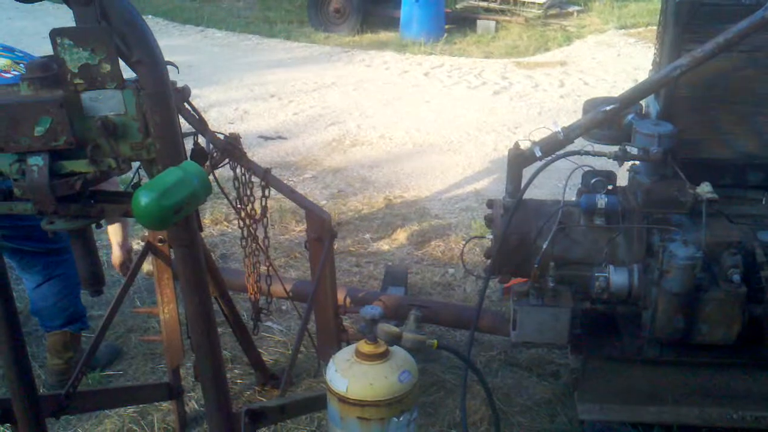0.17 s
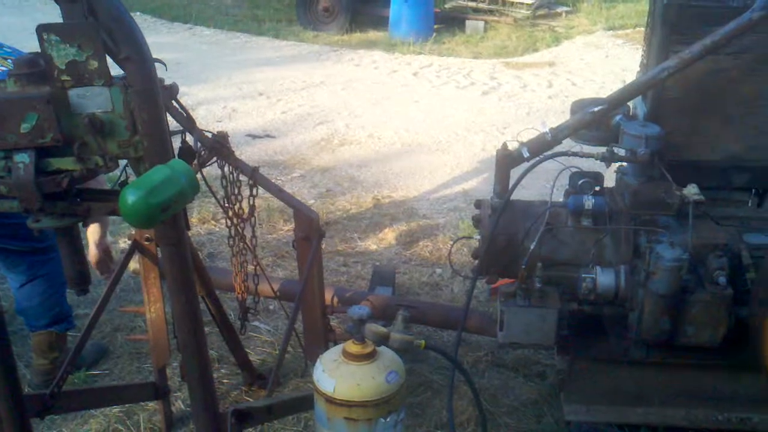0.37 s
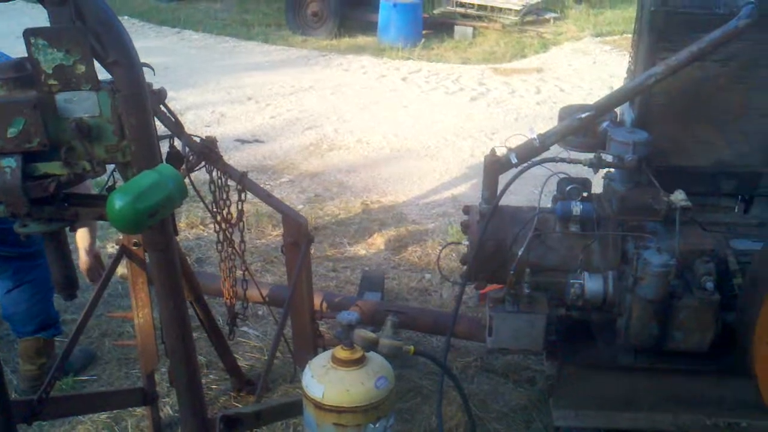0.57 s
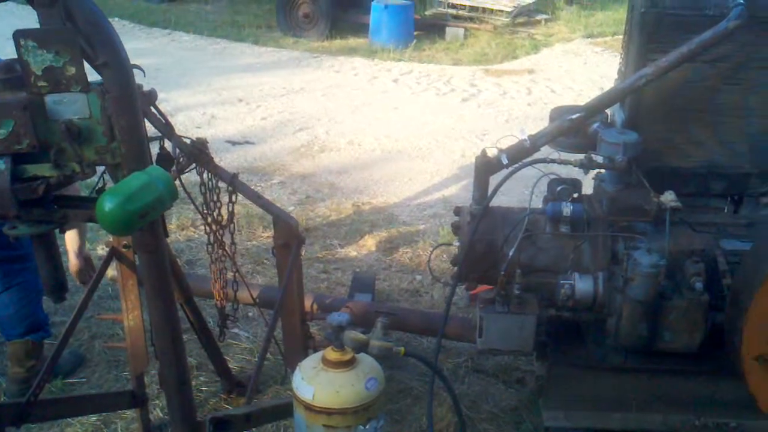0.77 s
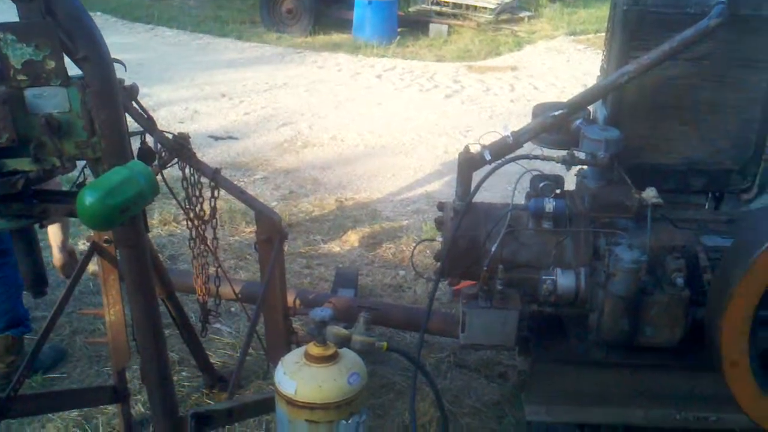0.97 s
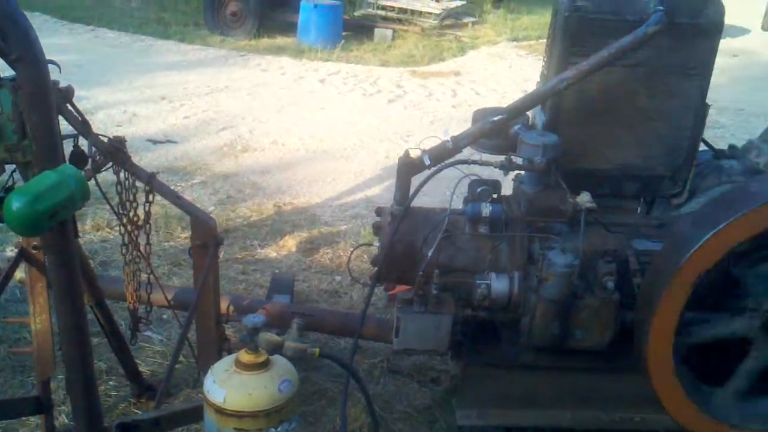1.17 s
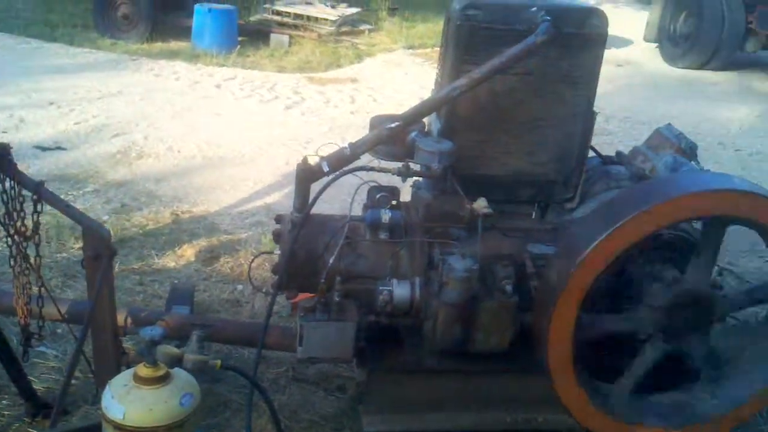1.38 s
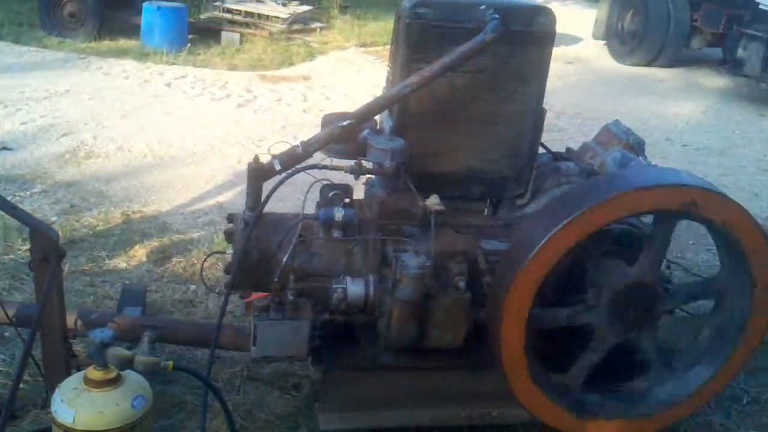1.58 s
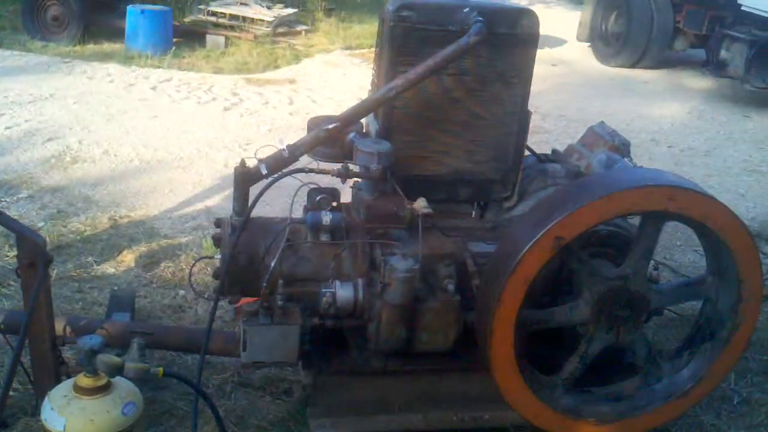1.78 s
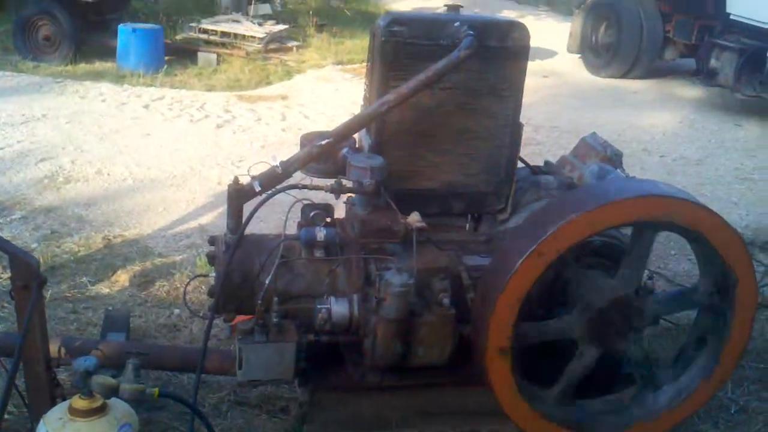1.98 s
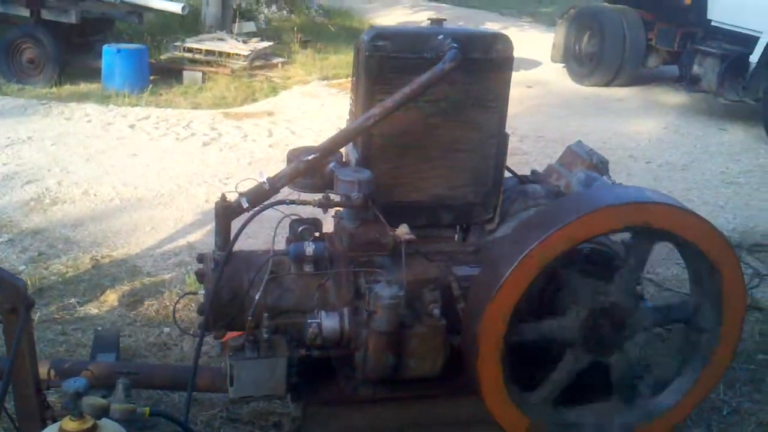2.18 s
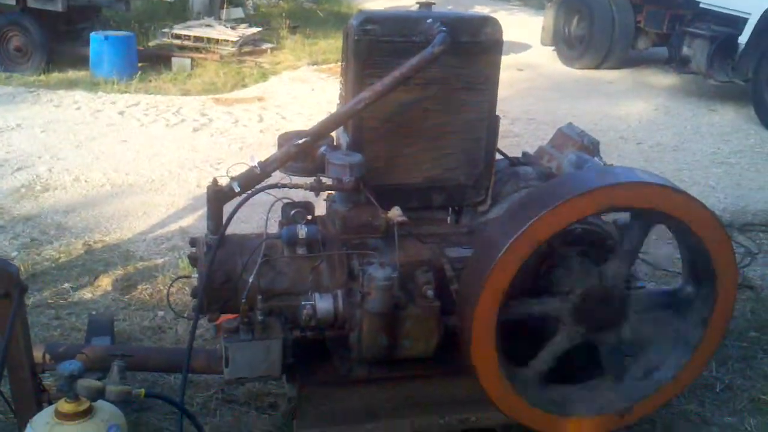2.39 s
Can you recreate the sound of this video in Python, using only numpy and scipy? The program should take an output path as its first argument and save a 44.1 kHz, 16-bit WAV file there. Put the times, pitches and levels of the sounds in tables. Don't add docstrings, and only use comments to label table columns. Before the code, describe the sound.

Old flywheel engine outdoors, heard from nearby on a small stereo recorder: loud raspy pop with a short hiss, then three breathy puffs growing slightly stronger, repeated three times over a very faint yard background.

```python
import sys
import numpy as np
from scipy import signal
from scipy.fft import rfft, irfft, next_fast_len
from scipy.io import wavfile
from scipy.ndimage import uniform_filter1d

SR = 44100
rng = np.random.default_rng(int(sys.argv[2]) if len(sys.argv) > 2 else 0)


def generate_wav(signal):
    frames = np.transpose(np.atleast_2d(signal))
    scaled = np.clip(frames, -1, 1) * 32767
    pcm = np.round(scaled).astype(np.int16)
    wavfile.write(sys.argv[1], SR, pcm)


def attenuation_scalar(level_db):
    decades = np.asarray(level_db, float) / 20
    return 10 ** decades


N = 108045
LEAD = 4410

# (time [s], peak [dB])
FIRINGS = [
    (0.205, -4.5),
    (1.159, -4.5),
    (2.111, -5.5),
]
# (time [s], peak [dB])
COASTS = [(0.439, -25), (0.678, -22), (0.917, -19.5), (1.393, -25), (1.631, -23), (1.871, -20.5),
          (2.346, -24)]
# (time [s], peak [dB])
EARLIER_COAST = (-0.029, -21.5)
# (time [s], peak [dB])
COOL_SHUTS = [(.066, -26.5), (.542, -32), (.781, -30), (1.023, -30.5), (1.496, -32), (1.734, -31),
              (1.975, -30.5), (2.446, -33)]
# (time [s], peak [dB])
HOT_SHUTS = [(.305, -31), (1.260, -32), (2.214, -32.5)]

# (delay [ms], shell ring [dB], low push [dB])
FIRE_SURGES = [(0.0, -1, -4), (4.73, -10.5, -9), (9.34, -9.5, -5.5), (14.96, -0.5, -2), (21.05, -5, -3.5),
               (26.38, -12, -6.5), (38.03, -14.5, -15)]
# (delay [ms], shell ring [dB], low push [dB])
COAST_SURGES = [(0.0, -1, 0), (11.925, -8, -0.5), (16.24, -10.5, -11), (22.48, -22.5, 0),
                (32.98, -15.5, -3.5), (50.63, -52, -9.5)]
# (delay [ms], shell ring [dB], low push [dB])
SHUT_SURGES = [(-18.5, -31, -15), (0.5, 1.5, 3), (11, -4, 3), (16.5, -40, -5.5), (50, -11, -18)]

# (peak at [ms], jet rise [ms], jet t60 [s], pipe t60 [s],
# tail [dB], tail t60 [s], pipe noise [dB], hiss [dB])
FIRE_FLOW = (25.5, 6.5, 0.0521, 0.002, -11, 0.24, -13, -18)
COAST_FLOW = (29, 6, 0.24, 0.32, -26, 0.54, -16.5, -34)
# (mode [Hz], level [dB], t60 [s])
COOL_PIPE = [(91.8, -2, 0.105), (192, 4.5, 0.033), (275, 4.5, 0.077), (405, -3, 0.04), (479, -16, 0.27),
             (794, -13.5, 0.035), (995, -7.5, 0.033), (1060, -9, 0.047), (1168, -13.5, 0.28),
             (1254, -11, 0.061), (1327, -14, 0.077), (1440, -37, .08), (2440, -17, 0.081)]
# (mode [Hz], level [dB], t60 [s])
HOT_PIPE = [(146.4, 1.5, 0.091), (324.3, 3.5, 0.085), (649, -9.5, 0.063), (512.5, -3.5, 0.071),
            (820, -3, 0.038), (950, -11, 0.033), (992, -7, 0.042), (1085, -4.5, 0.049), (1190, -13, 0.073),
            (1216, -7, 0.057), (1340, -15.5, 0.062), (1370, -17, 0.088), (1400, -24, 0.19),
            (1843, -19.5, 0.13)]
# (frequency [Hz], density [dB per Hz])
HISS = [(900, -8), (1600, -3.5), (2600, -10), (3300, -15.5), (5000, -9.5), (6500, -7.5), (9500, -13),
        (14000, -17)]
# (centre [Hz], width [Hz], gain [dB])
JET_PEAKS = [(2750, 430, 15), (3060, 83, 12), (3826, 40, 10), (5460, 200, 5.5)]

SHUT_PIPE_HZ = [141, 236, 327, 409, 516, 612, 1000, 1090, 1250]
# (level [dB], t60 [s])
SHUT_PIPE = [(-3, 0.99), (-0.5, 0.58), (4.5, 0.48), (-8.5, 0.9), (-13, 0.9), (-16, 0.45), (-15, 0.5),
             (-5, 0.11), (-18, 0.26)]

# (time [s], level [dB], pitch [Hz])
TICKS = [(0.183, -43.5, 5640), (0.626, -56, 6340), (1.138, -71, 5500), (1.579, -74, 6000),
         (1.882, -68, 5330), (2.09, -64, 5550)]
# (frequency [Hz], density [dB per Hz])
YARD = [(40, -11), (90, 4), (250, 2.5), (739, -7.5), (1300, -11), (2520, -22.5), (4010, -24), (14000, -35)]
# (delay [s], level [dB])
ECHOES = [(.019, -26), (0.031, -32), (0.054, -34.5), (0.08, -29.5)]
# (frequency [Hz], gain [dB])
SIDE_COLOUR = [(40, -20), (140, -16.5), (300, -20.5), (650, -4), (1000, -9.5), (1700, 4.5), (2600, -1.5),
               (5000, 0.6)]


def at_hz(points, hz):
    table_hz, value = np.array(points)[:, :2].T
    return np.interp(np.log(hz + 1), np.log(table_hz), value)


def rms_one(x):
    return x / np.sqrt(np.mean(x ** 2) + 1e-20)


def resonance(x, hz, width_hz):
    r = np.exp(-np.pi * width_hz / SR)
    zeros = np.array([1, 0, -1]) * (1 - r * r) / 2
    poles = [1, -2 * r * np.cos(2 * np.pi * hz / SR), r * r]
    return signal.lfilter(zeros, poles, x + 1e-18)


def ring(x, hz, t60_s):
    r = attenuation_scalar(-60 / (t60_s * SR))
    w = 2 * np.pi * hz / SR
    return signal.lfilter([0, np.sin(w)], [1, -2 * r * np.cos(w), r * r], x + 1e-18)


def burst(clicks, hz, length_ms):
    t = np.arange(0, length_ms / 1000, 1 / SR)
    swell = np.sin(np.pi * (t / t[-1]) ** 0.8) ** 2
    return signal.fftconvolve(clicks, swell * np.sin(2 * np.pi * hz * t))[:len(clicks)]


def time_s():
    return (np.arange(N + LEAD) - LEAD) / SR


def clicks_at(seconds, gains):
    out = np.zeros(N + LEAD + SR)
    np.add.at(out, LEAD + np.round(np.asarray(seconds) * SR).astype(int), gains)
    return out[:N + LEAD]


def coloured(spectrum, patchy_db):
    out = 0
    edges_hz = 40 * 2 ** np.arange(0, 8.6, 0.5)
    white = rng.standard_normal((2, 2, N + LEAD))
    for k, (low, high) in enumerate(zip(edges_hz, edges_hz[1:])):
        flicker = rms_one(uniform_filter1d(rng.standard_normal(N + LEAD), size=1500))
        bandpass = signal.butter(2, [low, high], "band", fs=SR, output="sos")
        band = signal.sosfilt(bandpass, white[k % 2])
        out = out + attenuation_scalar(at_hz(spectrum, np.sqrt(low * high)) + patchy_db * flicker) * band
    return rms_one(out)


def muffler(events, pattern):
    rows = np.array([(s + (ms - 0.7) / 1000, db + ring_db, db + push_db)
                     for s, db in events for ms, ring_db, push_db in pattern])
    vary = attenuation_scalar(0.8 * rng.standard_normal((len(rows), 2)))
    sharp = clicks_at(rows[:, 0], attenuation_scalar(rows[:, 1]) * vary[:, 0])
    push = clicks_at(rows[:, 0], attenuation_scalar(rows[:, 2]) * vary[:, 1])
    shell_ms = 5.6
    shell = burst(sharp, 1190, shell_ms) + attenuation_scalar(-14) * burst(sharp, 2500, shell_ms / 1.77)
    return shell - burst(push, 315, length_ms=8.66)


def flow(events, shape):
    peak_ms, rise_ms, jet_t60_s, pipe_t60_s, tail_db, tail_t60_s, pipe_db, hiss_db = shape
    pipe_rise_ms = rise_ms * 7.1
    pipe, jet = 0, 0
    for s, db in events:
        ms = (time_s() - s) * 1000 - peak_ms
        late_s = np.maximum(ms, 0) / 1000
        early_ms = np.minimum(ms, 0)
        opened = np.clip((ms + peak_ms) / 8, 0, 1)
        tail = attenuation_scalar(tail_db - 60 * late_s / tail_t60_s)
        pipe_fall = (attenuation_scalar(-60 * late_s / pipe_t60_s) + tail) * opened
        jet_fall = (attenuation_scalar(-60 * late_s / jet_t60_s) + tail) * opened
        pipe = pipe + attenuation_scalar(db + pipe_db) * pipe_fall * np.exp(early_ms / pipe_rise_ms)
        jet = jet + attenuation_scalar(db + hiss_db) * jet_fall * np.exp(early_ms / rise_ms)
    return pipe, jet


def gas(coasts):
    port_difference = 0.8
    roar, jet = 0, 0
    for events, shape, modes in [(FIRINGS, FIRE_FLOW, HOT_PIPE), (coasts, COAST_FLOW, COOL_PIPE)]:
        pipe, mouth = flow(events, shape)
        white = rng.standard_normal((2, 2, N + LEAD)) * pipe
        white = white[:, :1] + white[:, 1:] * [[0], [port_difference]]
        for k, (hz, db, t60_s) in enumerate(modes):
            roar = roar + attenuation_scalar(db) * ring(white[k % 2], hz, t60_s) / np.sqrt(t60_s * SR / 27)
        jet = jet + mouth
    roar = signal.sosfilt(signal.butter(4, 2060, fs=SR, output="sos"), roar)
    hiss = coloured(HISS, patchy_db=0.5)
    hiss = hiss + sum((attenuation_scalar(db) - 1) * resonance(hiss, hz, width_hz) for hz, width_hz, db in JET_PEAKS)
    return roar + jet * hiss


def yard():
    return attenuation_scalar(-44) * coloured(YARD, patchy_db=3)


def shut_pipe(events, tuning, tilt_db_per_octave):
    reopen_s, reopen_fade_s, ring_db = 0.14, 0.017, -6.5
    out = 0
    luck_db = rng.standard_normal((len(events), len(SHUT_PIPE)))
    soft = signal.windows.hann(25) / 6
    for (s, db), row in zip(events, luck_db):
        click = np.convolve(clicks_at([s - 0.006], attenuation_scalar(db + ring_db)), soft)[:N + LEAD]
        reopening = np.clip((time_s() - s - reopen_s) / reopen_fade_s, -50, 50)
        still_shut = 1 / (1 + np.exp(reopening))
        modes = 0
        for k, (hz, (level_db, t60_s), vary_db) in enumerate(zip(SHUT_PIPE_HZ, SHUT_PIPE, row)):
            tilt_db = tilt_db_per_octave * abs(np.log2(hz / SHUT_PIPE_HZ[1]))
            gain = attenuation_scalar(level_db + vary_db + tilt_db) * (-1) ** k
            modes = modes + gain * ring(click, hz * tuning, t60_s)
        out = out + still_shut * modes
    return out


def linkage():
    return sum(ring(clicks_at([s, s + 0.0029], attenuation_scalar(db)), hz, t60_s=0.03) for s, db, hz in TICKS)


def yard_echoes(engine):
    dull = signal.lfilter([0.4], [1, -0.6], engine)
    out = 0
    for s, db in ECHOES:
        first = np.roll(dull[0], int(s * SR))
        second = -np.roll(dull[1], int(s * 1.07 * SR))
        out = out + attenuation_scalar(db) * np.array([first, second])
    return out * (np.arange(N + LEAD) > LEAD - 100)


def scene():
    coasts = list(COASTS) + [EARLIER_COAST]
    valve = muffler(coasts, COAST_SURGES) + muffler(FIRINGS, FIRE_SURGES)
    valve = valve + muffler(COOL_SHUTS, SHUT_SURGES) + attenuation_scalar(-5) * muffler(HOT_SHUTS, SHUT_SURGES)
    pipe = shut_pipe(COOL_SHUTS, tuning=0.97, tilt_db_per_octave=0)
    pipe = pipe + shut_pipe(HOT_SHUTS, tuning=1.1, tilt_db_per_octave=-5.5)
    engine = valve + gas(coasts) + pipe + linkage()
    return (engine + yard_echoes(engine) + yard())[:, LEAD:]


def roll_off(x):
    return signal.sosfilt(signal.butter(12, 14920, fs=SR, output="sos"), x)


def record(dry):
    comb_hz, null_width_hz, treble_null_share = 2600, 190, 0.7
    size = next_fast_len(N + LEAD)
    hz = np.fft.rfftfreq(size, 1 / SR)
    late = np.exp(-2j * np.pi * hz / comb_hz) * np.where(hz > 4320, 0.13, 1)

    def null(turns, share=1):
        return 1 - share * np.exp(-((hz - turns * comb_hz) / null_width_hz) ** 2)

    mid_gain = (1 - late) / 2 * null(1)
    for turns in range(2, 6):
        mid_gain = mid_gain * null(turns, treble_null_share)
    side_gain = (1 + late) / 2 * null(0.5) * null(1.5) * null(2.5, treble_null_share)
    lean = np.exp(0.28j * np.pi / (1 + (hz / 202) ** 4))
    side_gain = side_gain * lean * attenuation_scalar(at_hz(SIDE_COLOUR, hz))
    mid = irfft(rfft(dry[0], size) * mid_gain, size)[:N]
    side = irfft(rfft(dry[1], size) * side_gain, size)[:N]
    peak_top = 3
    mix = peak_top * np.tanh(np.array([mid + side, mid - side]) / peak_top)
    mix = signal.sosfilt(signal.cheby2(12, 60, 14900, fs=SR, output="sos"), mix)
    return roll_off(mix)


dry = scene()
out = record(dry)
generate_wav(out)
```